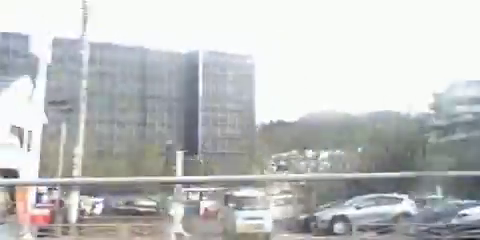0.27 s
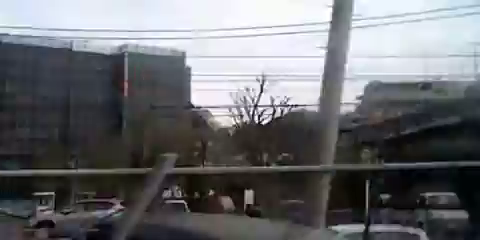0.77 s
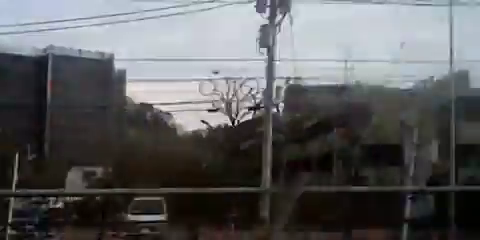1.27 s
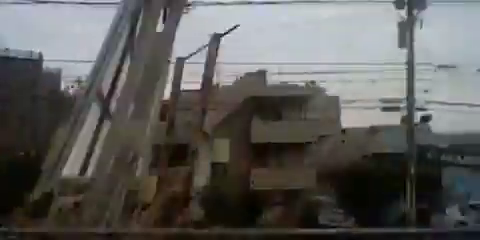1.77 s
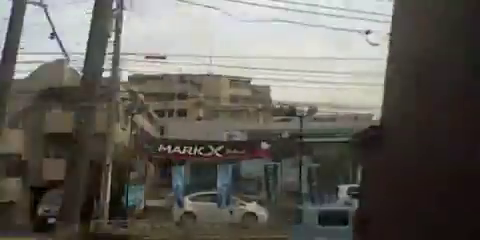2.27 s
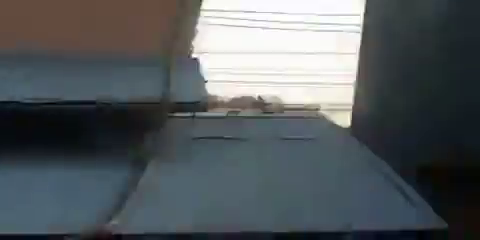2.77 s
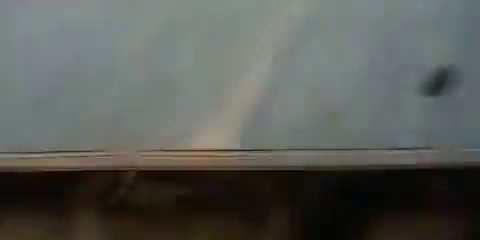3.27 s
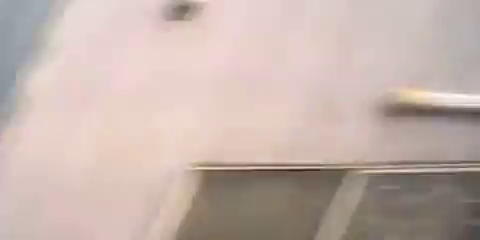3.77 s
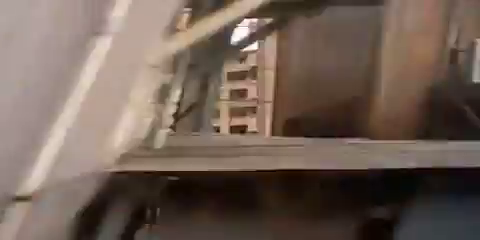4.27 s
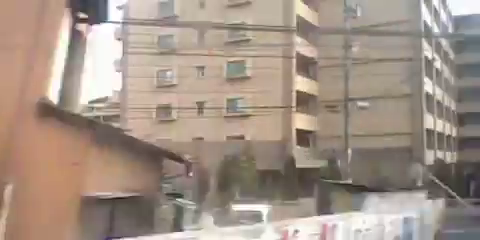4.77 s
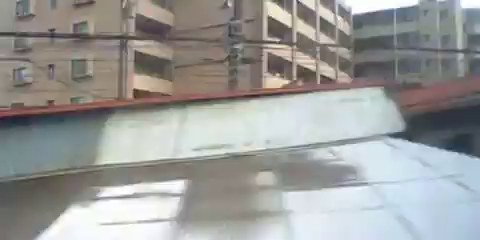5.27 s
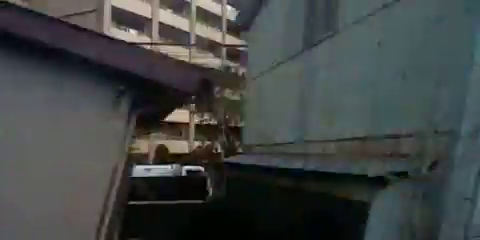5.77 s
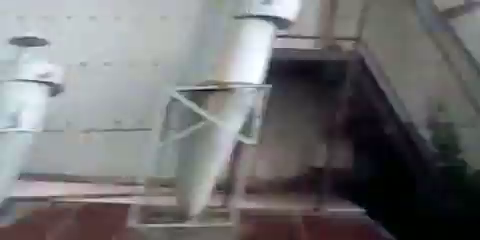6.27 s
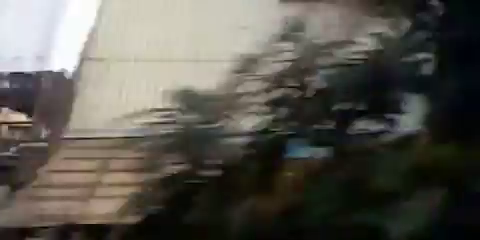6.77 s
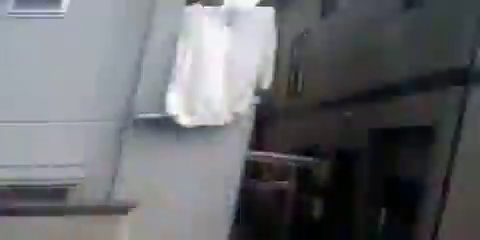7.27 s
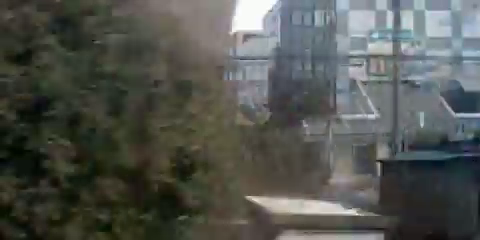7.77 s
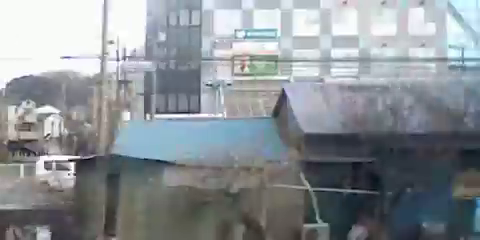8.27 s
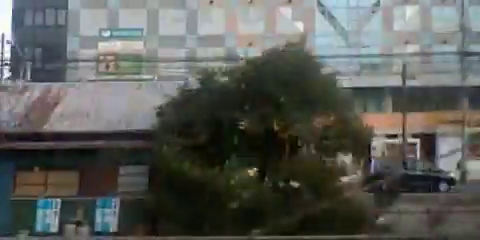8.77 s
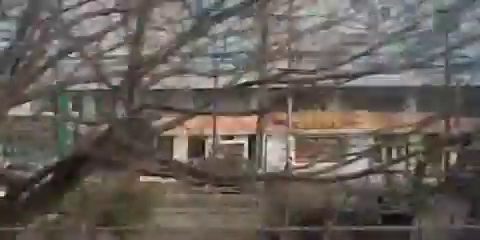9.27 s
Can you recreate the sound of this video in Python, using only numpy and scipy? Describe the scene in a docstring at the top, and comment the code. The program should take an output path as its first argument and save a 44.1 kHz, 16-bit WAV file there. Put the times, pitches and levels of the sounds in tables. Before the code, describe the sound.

An electric train runs at speed, heard from inside, with a steady deep rumble, faint whine, wheel clacks and a brief rail howl.

```python
"""A deep rumble and a floor drone, inside a passenger car of an electric train at speed.
Rough track shakes the shell and floor panels and sets rail and wheels singing in broad resonances;
the drive whines faintly and air hisses past the window. A bogie clacks over joints and rough spots,
trackside objects whoosh by, and later the rail swells to a howl while a loose fitting ticks."""
import sys
import numpy as np
from scipy import signal
from scipy.io import wavfile
from scipy.ndimage import uniform_filter1d

SR = 44100
rng = np.random.default_rng(int(sys.argv[2]) if len(sys.argv) > 2 else 0)


def unload_wav(signal):
    """Save mono or channel-first audio to the path in sys.argv[1] as 16-bit WAV at rate SR, clipped to [-1, 1]."""
    wavfile.write(
        sys.argv[1],
        SR,
        np.round(np.clip(np.atleast_2d(signal).T, -1, 1) * 32767).astype(np.int16),
    )


N = 420254
T = np.arange(N) / SR


def gain_of(db):
    return 10 ** (np.asarray(db) / 20)


def unit_rms(x):
    return x / np.sqrt(np.mean(x ** 2) + 1e-20)


def automation(rows):
    """One curve per control, ramping between the timed rows."""
    time_s, *controls = np.transpose(rows)
    return [np.interp(T, time_s, control) for control in controls]


def wander(top_hz):
    """Slow random drift of rms 1: sines of random phase up to top_hz."""
    t = T[::64]
    rates_hz = np.geomspace(top_hz / 6, top_hz, 24)
    drift = sum(np.sin(2 * np.pi * (hz * t + rng.random())) for hz in rates_hz)
    return np.interp(T, t, unit_rms(drift))


def resonate(x, hz, width_hz):
    """A steep resonance that can glide: shift hz down to zero, smooth twice, shift back."""
    carrier = np.exp(2j * np.pi * np.cumsum(hz * np.ones(len(x))) / SR)
    r = np.exp(-np.pi * width_hz / SR)
    return 2 * (carrier * signal.lfilter([(1 - r) ** 2], [1, -2 * r, r * r], x / carrier)).real


def ring_modes(x, modes):
    """A body ringing in several resonances of alternating polarity."""
    return sum((-1) ** k * gain_of(db) * resonate(x, hz, width_hz) / np.sqrt(width_hz)
               for k, (hz, width_hz, db) in enumerate(modes))


def shaped_noise(eq, patchy_db=0., size=2048):
    """Noise of rms 1 under an EQ curve, with drifting louder and softer patches."""
    hz = np.fft.rfftfreq(size, 1 / SR)
    eq_hz, eq_db = np.transpose(eq)
    real, imag, patches = rng.standard_normal((4 * N // size + 5, len(hz), 3)).T
    patches = uniform_filter1d(patches, size=14, axis=0)  # across frequency
    patches = unit_rms(uniform_filter1d(patches, size=8, axis=1))  # across time
    colour_db = np.interp(np.log(hz + 1), np.log(eq_hz + 1), eq_db, -150, -150)
    spectra = (real + 1j * imag) * gain_of(colour_db[:, None] + patchy_db * patches)
    return unit_rms(signal.istft(spectra, nperseg=size, noverlap=size - size // 4)[1][:N])


# Level rides from track roughness: time_s, rumble_db, low_drone_db, upper_drone_db
TRACK_ROUGHNESS = [(0.0, -20.5, -28.5, -31), (0.34, -16, -25.5, -27), (0.64, -21.5, -24.5, -27),
                   (1.14, -20.5, -28, -32), (1.48, -19.5, -25, -28.5), (1.62, -22.5, -25, -30),
                   (1.96, -18, -30, -31), (3.56, -23, -27, -30), (4.33, -20.5, -29, -34),
                   (4.7, -20, -27.5, -31.5), (5.47, -21.5, -26, -27), (5.71, -22, -30.5, -33.5),
                   (6.0, -23, -32, -33), (6.87, -23, -30, -29.5), (7.17, -22.5, -31.5, -30.5),
                   (7.7, -21, -33.5, -26), (7.86, -20.5, -32, -28), (8.44, -24, -32.5, -31.5),
                   (8.86, -21.5, -29, -31), (9.53, -26, -33, -33)]
# Tone of the shell rumble and of the floor drone: freq_hz, relative_db
RUMBLE_EQ = [(6, -30), (10, 1.5), (25, 3.5), (35, -0.5), (50, 0), (61, -3.5), (75, -3.5), (98, -1.5),
             (120, -8), (170, -13.5), (220, -41.5)]
DRONE_EQ = [(76, -30), (130, -2), (215, -5), (280, -5), (400, -3.5), (560, -5.5), (800, -12), (1030, -14),
            (1150, -15), (1300, -21), (1480, -21), (1650, -28), (2000, -29.5), (2600, -61)]
# Floor panel resonances: pitch_hz, width_hz, relative_db
PANEL_MODES = [(190, 30, -5), (278, 22, 0), (308, 26, -6), (386, 25, -5), (465, 40, -8), (503, 30, -6),
               (608, 30, -8), (722, 18, -9), (815, 40, -11), (914, 40, -11)]


def car_body():
    """The low bed: the shell booms; the floor passes a broad drone and rings in its panel modes."""
    rumble_db, low_db, upper_db = automation(TRACK_ROUGHNESS)
    panels = unit_rms(ring_modes(rng.standard_normal(N), PANEL_MODES))
    drone = shaped_noise(DRONE_EQ, patchy_db=1.5) + gain_of(-4.5) * panels
    low = signal.sosfiltfilt(signal.butter(3, 345, fs=SR, output="sos"), drone)
    floor = gain_of(low_db) * unit_rms(low) + gain_of(upper_db) * unit_rms(drone - low)
    shell = gain_of(rumble_db) * shaped_noise(RUMBLE_EQ, size=8192)
    return shell + gain_of(0.92 * wander(top_hz=9)) * floor


# Brief swells of rail and wheels: peak_s, fall_s, song_boost_db, high_ring_boost_db, wheel_boost_db
SWELLS = [(.55, 0.068, 0, -3, 4.5), (.8, 0.079, 3, 4, 6), (1.27, 0.057, 0.5, 1, 5), (1.48, .07, -2, 0, 2.5),
          (2.25, .1, 5, 2, 0.5), (2.53, .05, 2.5, -1, 2.5), (3.0, .12, 2, 4, 3), (3.33, 0.062, 4.5, 1, 5),
          (3.55, 0.074, 3.5, 5.5, 7), (3.78, 0.072, 1.5, 0, 2), (4.35, 0.17, 4, 7, 5),
          (4.88, 0.16, 6, 14, 6), (5.27, 0.076, 7.5, 10, 5), (5.5, 0.088, 2.5, 5.5, 4),
          (6.93, .07, 1.5, 1, 4.5), (7.62, 0.13, 8.5, 7, 6), (8.68, 0.087, 3, 2, 5.5)]


def swell_boosts():
    """Brief, soft swells of the rail song, high ring and wheel ring, as three curves in dB."""
    t = T[::64]
    peak_s, fall_s, *boosts_db = np.transpose(SWELLS)
    from_peak = (t - peak_s[:, None]) / fall_s[:, None]
    stretch = np.where(from_peak < 0, 0.71, 1)  # rises faster than it falls
    swells = np.exp(-(from_peak / stretch) ** 2 / 2)
    return [np.interp(T, t, db @ swells) for db in boosts_db]


# The rail's gliding howl: time_s, pitch_hz, level_db
RAIL_HOWL = [(0, 920, -44.5), (.5, 928, -39), (1.7, 935, -41.5), (4.1, 934, -39), (5.15, 940, -39.5),
             (5.32, 937, -34), (5.75, 946, -41), (6.25, 938, -34), (6.55, 920, -39), (6.64, 894, -28),
             (6.85, 891, -25.5), (7.25, 915, -31), (7.55, 914, -23), (7.8, 905, -26), (8, 905, -32),
             (8.3, 937, -30), (8.57, 948, -31), (8.68, 942, -37), (9.1, 950, -43), (9.53, 960, -41)]


def rails():
    """Wheel and rail roughness excites three rail resonances: a low song, a howl and a high ring."""
    base_song_db, base_ring_db = -34.5, -47.5
    song_boost_db, ring_boost_db, _ = swell_boosts()
    howl_hz, howl_db = automation(RAIL_HOWL)
    levels_db = (base_song_db + song_boost_db, howl_db, base_ring_db + ring_boost_db)
    gains = [gain_of(db + 1.1 * wander(top_hz=7)) for db in levels_db]
    roughness = rng.standard_normal((3, N))
    song = resonate(roughness[0], hz=760.4, width_hz=170)
    howl = resonate(roughness[1], howl_hz, width_hz=200)
    howl = resonate(howl, howl_hz, width_hz=200)  # a second pass tightens the pitch
    ring = resonate(roughness[2], hz=1360, width_hz=150)
    return sum(gain * unit_rms(layer) for gain, layer in zip(gains, (song, howl, ring)))


# Level rides at the window: time_s, wheels_db, hiss_db
WINDOW_LEVELS = [(0, -54, -51), (.3, -50.5, -52), (1.1, -48.5, -54.5), (1.3, -48.5, -54.5),
                 (2.1, -44.5, -53), (2.5, -45.5, -49.5), (2.7, -49, -51), (3.2, -51, -53.5),
                 (4, -52.5, -54), (4.6, -48, -51.5), (5.6, -46.5, -52), (5.78, -49, -53.5),
                 (6.3, -49, -56.5), (7.3, -51, -55), (7.6, -51, -52.5), (8.15, -53.5, -49.5),
                 (8.7, -51, -53), (9.35, -52, -54.5), (9.53, -52, -49.5)]
# Tone of the ringing wheels and of the rushing air: freq_hz, relative_db
WHEEL_EQ = [(1030, -34.5), (1750, -8), (1980, -1.5), (2080, -0.5), (2160, 3), (2250, 0), (2330, 1),
            (2430, -5.5), (2590, -6.5), (3000, -14.5), (3900, -44)]
HISS_EQ = [(1500, -28.5), (2500, -5), (3000, -8), (3900, -7), (5000, -12.5), (6500, -17), (9500, -18.5)]
# Drive whine, set against the wheel ring: pitch_hz, width_hz, relative_db
DRIVE_WHINE = (2347, 18, -8.5)


def wheels_drive_and_air():
    """The bright bed, through the window: wheels ring, the drive whines and air hisses in fine grains."""
    wheels_db, hiss_db = automation(WINDOW_LEVELS)
    whine_hz, width_hz, whine_db = DRIVE_WHINE
    drive, grains = rng.standard_normal((2, N))
    whine = gain_of(whine_db) * unit_rms(resonate(drive, whine_hz, width_hz))
    wheels = shaped_noise(WHEEL_EQ, patchy_db=1.0, size=1024)
    flicker_db = 1.5 * unit_rms(uniform_filter1d(uniform_filter1d(grains, size=40), size=40))
    hiss = unit_rms(gain_of(flicker_db) * shaped_noise(HISS_EQ, patchy_db=-0.2, size=512))
    wheels_db += swell_boosts()[2] + 0.76 * wander(top_hz=12)
    hiss_db += 0.98 * wander(top_hz=12)
    return gain_of(wheels_db) * (wheels + whine) + gain_of(hiss_db) * hiss


# Wheel blows on joints and rough spots: start_s, peak_db, decay_s, pitch_hz, sharpness (0-1)
WHEEL_BLOWS = [(.08, -18, 0.034, 476, 0.1), (0.199, -15.5, 0.11, 410, 0.13),
               (.295, -12.5, 0.023, 294, 0.24), (.45, -10.5, 0.082, 495, 0.4), (1.275, -12, 0.032, 201, 0),
               (1.362, -11.5, 0.019, 191, 0.46), (1.529, -16.5, 0.064, 193, 0.3),
               (2.44, -16, 0.046, 484, 0.3), (5.24, -6, 0.02, 322, 0.62), (5.315, -3.5, 0.022, 315, 0.43),
               (5.345, -7, 0.016, 335, 0.5), (5.486, -4.5, .035, 278, 0.56), (5.521, -9, 0.016, 297, 0.46),
               (5.585, -10, 0.004, 310, 0.8), (7.615, -13, 0.016, 675, 0.15), (7.78, -10, 0.01, 637, 0.63),
               (8.685, -13, 0.019, 463, 0.33)]


def bogie_clacks():
    """Each blow is a cushioned hit with a short grinding jolt, heard through the floor panels."""
    out, t = np.zeros(N), np.arange(SR // 4) / SR
    damped_panels = [(hz, 1.94 * width_hz, db) for hz, width_hz, db in PANEL_MODES]
    for start_s, peak_db, decay_s, pitch_hz, sharpness in WHEEL_BLOWS:
        grind = rng.standard_normal(len(t))
        jolt = grind * np.exp(-t / decay_s) / np.sqrt(decay_s * SR / 2)  # energy 1, like the hit
        force = (1 - sharpness) * jolt + sharpness * (t == 0)
        blow = resonate(force, pitch_hz, width_hz=0.71 * pitch_hz)
        clack = ring_modes(blow, damped_panels)
        out[round(start_s * SR):][:len(t)] += gain_of(peak_db) * clack / abs(clack).max()
    return out


# Trackside objects going by: peak_s, level_db, centre_hz, width_hz, rise_s, fall_s
PASS_BYS = [(.42, -54, 4300, 3400, 0.076, .06), (1.73, -48.5, 4000, 2500, .02, 0.027),
            (2.4, -45.5, 3800, 3200, 0.076, .06), (2.71, -54, 4300, 1800, .04, .04),
            (2.86, -54, 4000, 1800, .02, .03), (3.61, -56, 4000, 1800, .05, .05),
            (4.44, -53, 3900, 1800, .03, .04), (4.67, -52, 4400, 2000, .02, .03),
            (4.96, -52, 4200, 2200, 0.063, 0.065), (5.34, -58, 6200, 2000, .015, .025),
            (8.135, -43.5, 4830, 4000, 0.011, 0.023), (8.35, -46.5, 4500, 3200, 0.051, 0.044),
            (8.95, -51.5, 4280, 3400, 0.074, 0.12), (9.2, -49, 4400, 3400, 0.039, 0.027)]


def trackside_whooshes():
    """Passing objects push air at the window: puffs of band noise that swell and die."""
    out, air = np.zeros(N), rng.standard_normal(N)
    for peak_s, level_db, centre_hz, width_hz, rise_s, fall_s in PASS_BYS:
        span = slice(round((peak_s - .3) * SR), round((peak_s + .4) * SR))
        t = T[span] - peak_s
        swell = np.exp(-(t / np.where(t < 0, rise_s, fall_s)) ** 2 / 2)
        puff = unit_rms(resonate(air[span], centre_hz, width_hz))
        out[span] += gain_of(level_db) * puff * swell
    return out


# Ticks of a loose fitting: start_s, level_db, pitch_hz
FITTING_TICKS = [(6.78, -33, 3400), (6.793, -35, 5500), (6.855, -32, 5000), (6.892, -30, 3600),
                 (7.06, -32, 3800)]


def fitting_ticks():
    """A loose fitting gives tiny dry clicks, a few cycles long."""
    out, t = np.zeros(N), np.arange(SR // 100) / SR
    decay_s = 0.00051
    for start_s, level_db, pitch_hz in FITTING_TICKS:
        tick = np.sin(2 * np.pi * pitch_hz * t) * np.exp(-t / decay_s)
        out[round(start_s * SR):][:len(t)] += gain_of(level_db) * tick
    return out


def scene():
    """Mono mix: the running bed with clacks, whooshes and ticks on top."""
    bed = car_body() + rails() + wheels_drive_and_air()
    return (bed + bogie_clacks() + trackside_whooshes() + fitting_ticks())[None]


# Treble roll-off of the microphone: freq_hz, gain_db
MIC_EQ = [(7000, 0), (7600, -1.5), (8100, -7.5), (8500, -17), (8900, -30.5)]


def record(dry):
    """Throbbing sampling jitter adds fizz in step with the wave's slope; then the top end rolls off."""
    throb_hz, cutoff_hz = 354.03, 9000
    throb = 1 + .62 * np.cos(2 * np.pi * throb_hz * T - 1.9)
    slope = np.gradient(uniform_filter1d(dry, size=8), axis=1)
    fizz = gain_of(-7.5) * throb * slope * rng.standard_normal(N)
    eq_hz, eq_db = np.transpose(MIC_EQ)
    grid_hz = np.linspace(0, SR / 2, 513)
    roll_off = signal.firwin2(255, grid_hz, gain_of(np.interp(grid_hz, eq_hz, eq_db)), fs=SR)
    high_cut = signal.firwin(1023, cutoff_hz, window=("kaiser", 9), fs=SR)
    return signal.oaconvolve(dry + fizz, np.convolve(roll_off, high_cut)[None], "same")


dry = scene()
out = record(dry)
unload_wav(out)
```